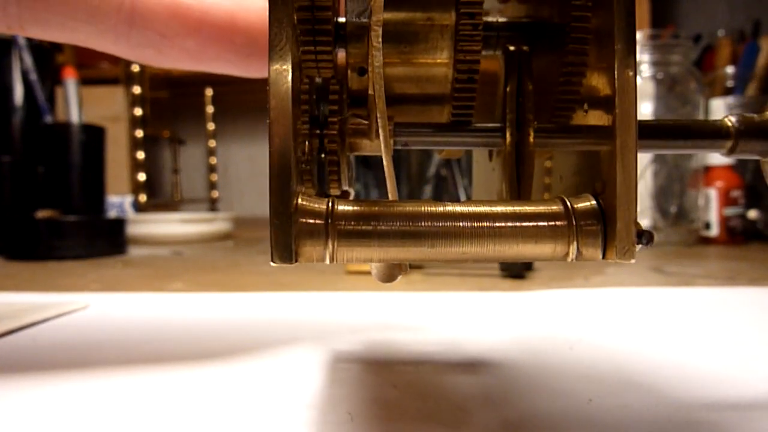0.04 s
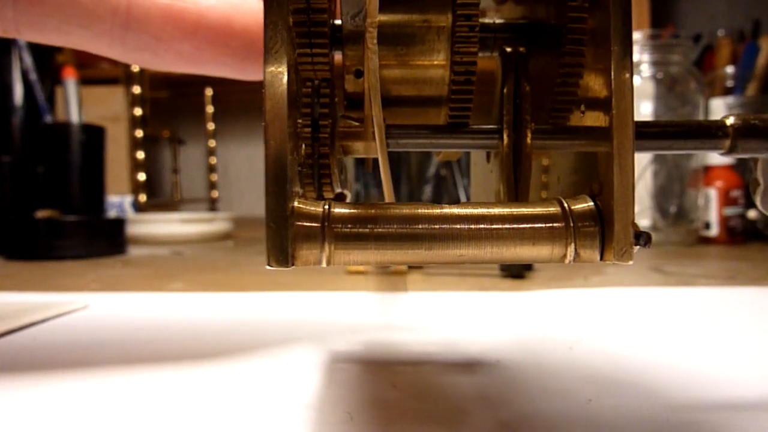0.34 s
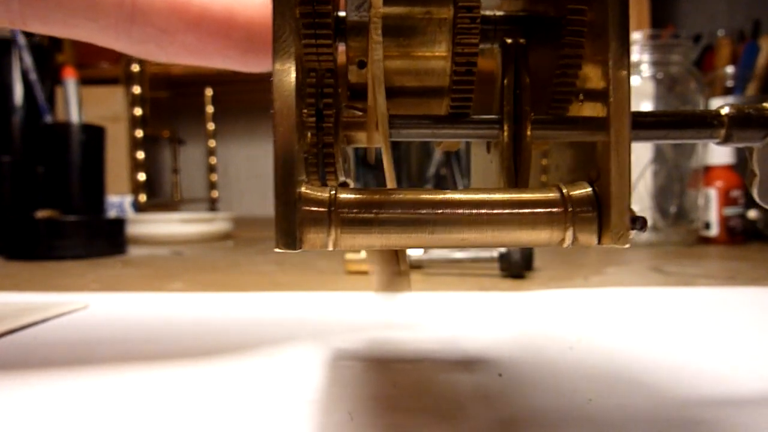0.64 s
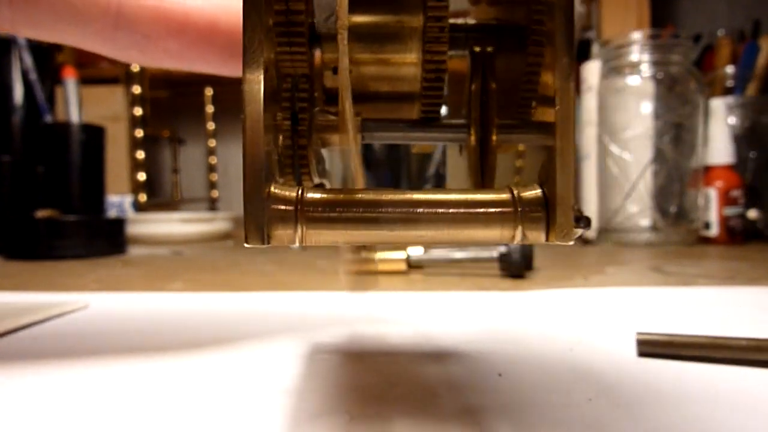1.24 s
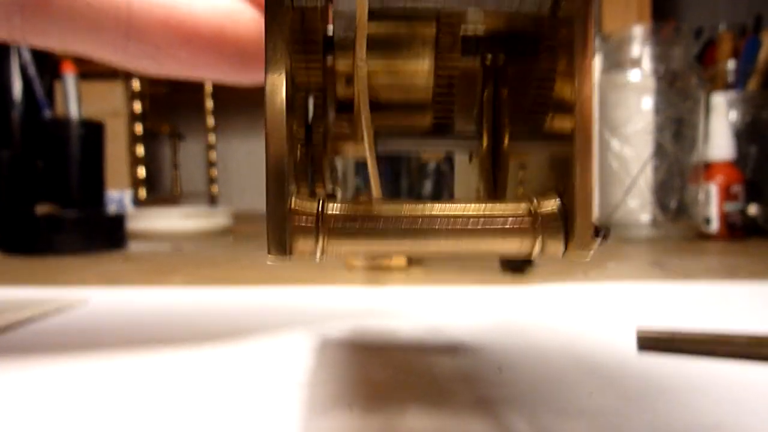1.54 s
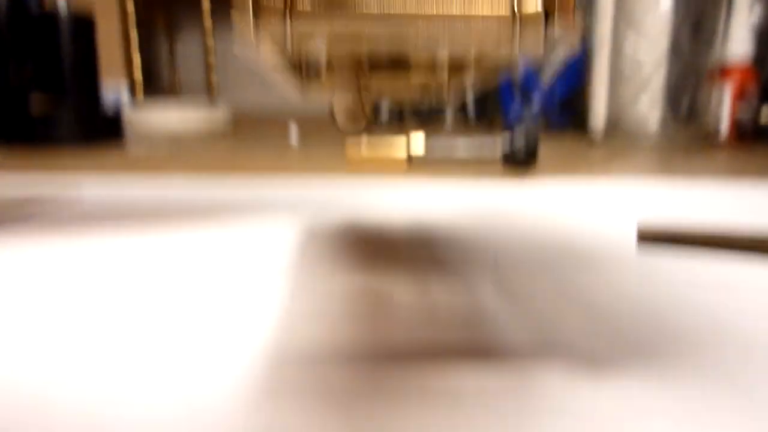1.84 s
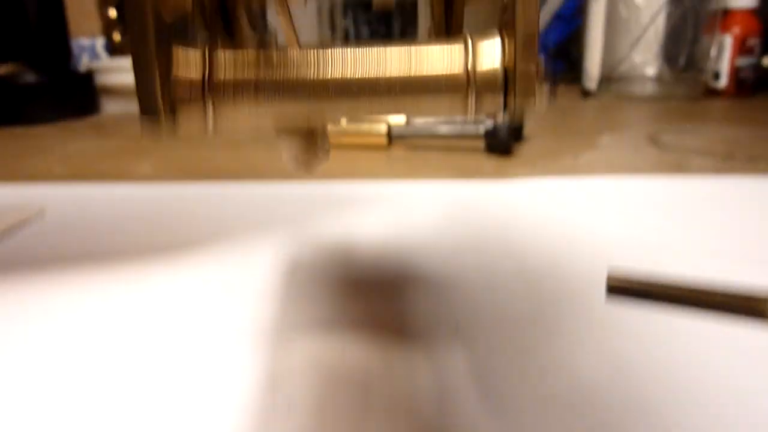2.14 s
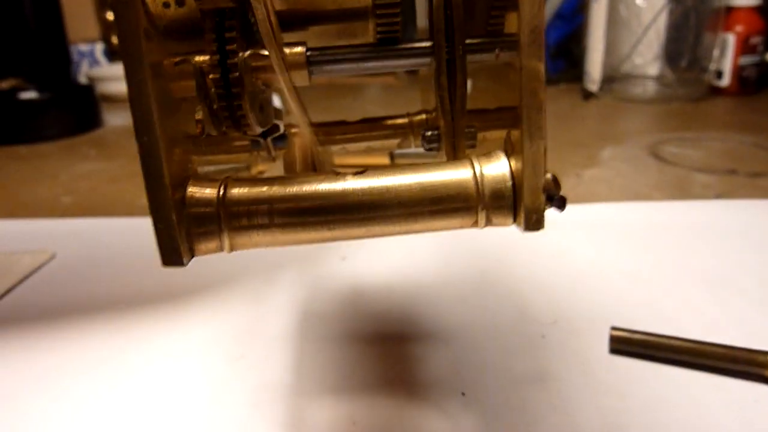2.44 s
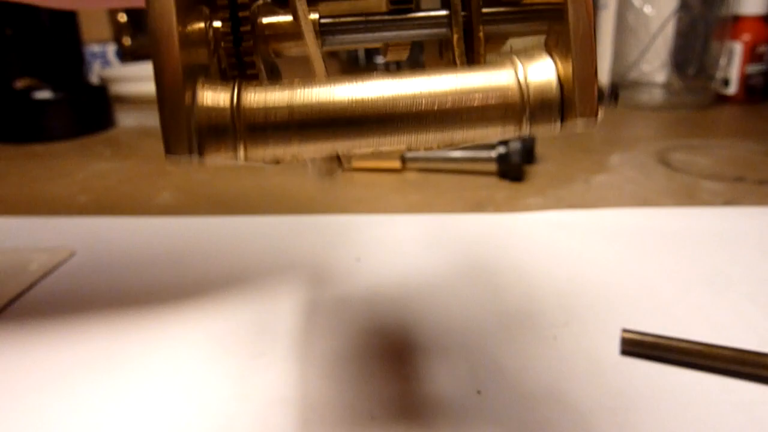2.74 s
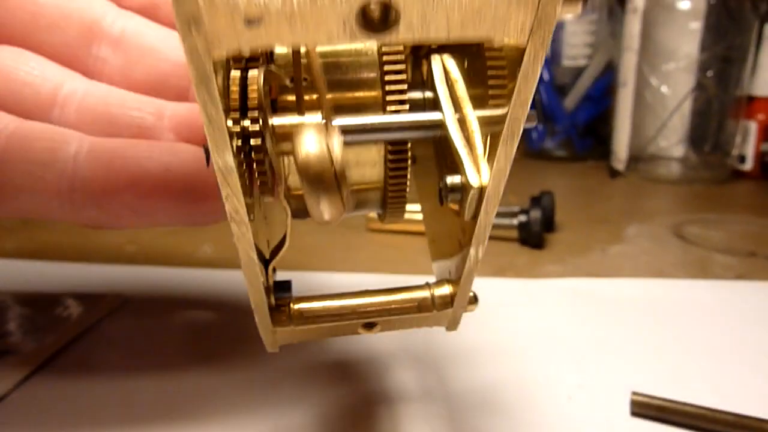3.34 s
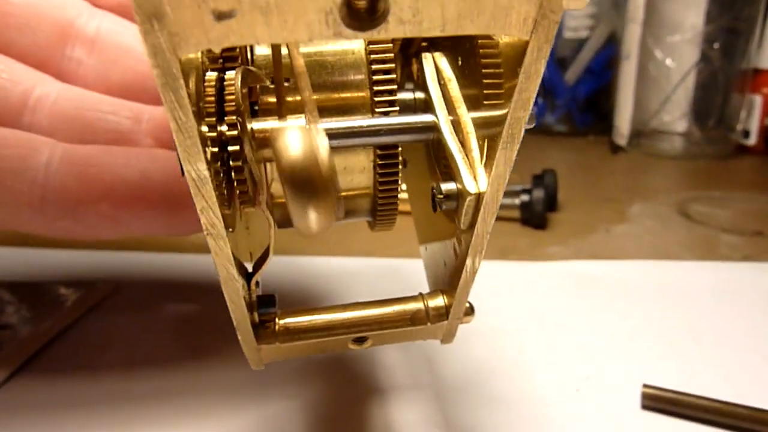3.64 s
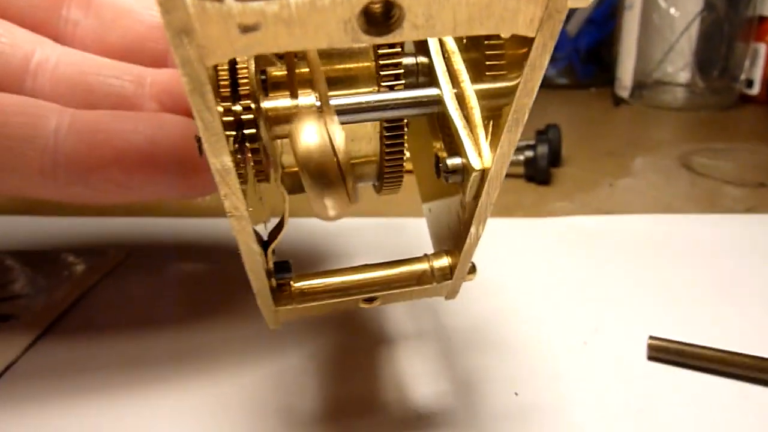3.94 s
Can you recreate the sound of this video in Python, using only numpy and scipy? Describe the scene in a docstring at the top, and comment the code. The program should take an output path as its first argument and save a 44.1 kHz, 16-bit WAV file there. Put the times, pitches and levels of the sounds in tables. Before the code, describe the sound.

Close up in a quiet room, a hand-held clockwork alarm runs as a fast, bright metallic rattle. A rod lands on the workbench with a dull thump early on, then the rattle changes tone and softens slightly.

```python
"""Close above a workbench in a cluttered workshop, a hand-held brass clock movement runs its alarm
train with no bell to strike. The hammer flies to and fro about twenty times a second, a tick on one
pallet and a tock on the other, each blow ringing the frame; in two spells a loose part tings along.
The rattle changes colour as the hand tips the movement, then turns it round. About a second in,
a steel rod is put down on the bench with a few dull thumps."""
import sys
import numpy as np
from scipy import signal
from scipy.fft import rfft, irfft
from scipy.io import wavfile
from scipy.ndimage import uniform_filter1d

SR = 44100
rng = np.random.default_rng(int(sys.argv[2]) if len(sys.argv) > 2 else 0)


def store_pcm(level_fs):
    """Save levels as 16-bit WAV."""
    pcm = np.round(np.clip(level_fs, -1, 1) * 32767).astype(np.int16)
    wavfile.write(sys.argv[1], SR, np.atleast_2d(pcm).T)


N = 4 * SR

# hammer thrown out, and thrown back (time [s], relative level [dB])
TICKS = [(0.1451, -13), (0.1865, -17.5), (0.2312, -16), (0.2757, -17.5), (0.3207, -19.5), (0.3657, -17.5),
         (0.4127, -19), (0.4593, -17), (0.5066, -19.5), (0.5551, -18.5), (0.6043, -19.5), (0.6532, -17.5),
         (0.7006, -18), (0.7479, -17.5), (0.7965, -18), (0.845, -19), (0.8922, -19.5), (0.9404, -18.5),
         (0.9866, -19.5), (1.0314, -19), (1.0776, -18.5), (1.1229, -16), (1.1694, -20.5), (1.2165, -20.5),
         (1.2635, -19.5), (1.3121, -18), (1.3605, -20.5), (1.4101, -16.5), (1.4582, -19), (1.5088, -19),
         (1.5581, -18), (1.6067, -17), (1.6564, -19), (1.7052, -18.5), (1.7545, -18.5), (1.8016, -20),
         (1.8501, -18.5), (1.8969, -19), (1.9444, -18), (1.9907, -18.5), (2.0377, -19), (2.0847, -18),
         (2.1315, -18.5), (2.18, -18), (2.229, -19), (2.2783, -19), (2.3274, -19.5), (2.3777, -17.5),
         (2.427, -17.5), (2.4748, -20), (2.524, -19), (2.5719, -17.5), (2.6204, -18), (2.6687, -19),
         (2.7171, -21), (2.7636, -22), (2.8113, -21.5), (2.857, -22), (2.9063, -21.5), (2.9536, -22.5),
         (3.0029, -23), (3.0518, -22), (3.1015, -19.5), (3.1524, -21), (3.2024, -20.5), (3.2536, -22),
         (3.3023, -20.5), (3.354, -22), (3.4041, -21.5), (3.4539, -19.5), (3.5037, -22), (3.5541, -20.5),
         (3.6037, -22.5), (3.6535, -21.5), (3.7024, -20), (3.7493, -21.5), (3.7991, -20.5), (3.8469, -21),
         (3.8979, -20.5), (3.9473, -21), (3.9986, -20)]
TOCKS = [(0.1617, -21), (0.2059, -21.5), (0.2506, -21), (0.295, -23), (0.3404, -22), (0.3866, -23.5),
         (0.4326, -21.5), (0.479, -21.5), (0.528, -21), (0.5762, -20.5), (0.6255, -21), (0.675, -22),
         (0.7198, -21), (0.7695, -21), (0.818, -23.5), (0.8656, -21), (0.9142, -22), (0.9607, -20),
         (1.0061, -21.5), (1.0522, -21.5), (1.0977, -22.5), (1.1421, -22), (1.1897, -24), (1.2356, -22),
         (1.285, -23.5), (1.333, -20), (1.3818, -23.5), (1.432, -22.5), (1.4794, -22.5), (1.5316, -22.5),
         (1.5775, -21.5), (1.6296, -23), (1.677, -22), (1.727, -21.5), (1.7758, -21), (1.8226, -21.5),
         (1.8702, -21.5), (1.917, -22), (1.9651, -22.5), (2.0103, -21), (2.058, -24), (2.1043, -24.5),
         (2.1523, -24.5), (2.2, -24), (2.2503, -25.5), (2.2998, -25.5), (2.3487, -23.5), (2.3997, -25),
         (2.4459, -23.5), (2.496, -24.5), (2.544, -26), (2.593, -24.5), (2.64, -24), (2.6892, -25.5),
         (2.736, -27.5), (2.7834, -25.5), (2.831, -27), (2.8769, -25.5), (2.925, -27), (2.9731, -25),
         (3.022, -24.5), (3.0702, -21), (3.1208, -23), (3.171, -25.5), (3.221, -25), (3.2726, -27),
         (3.321, -23.5), (3.3728, -24), (3.421, -24.5), (3.472, -25), (3.521, -24), (3.5716, -25),
         (3.6211, -24.5), (3.671, -26), (3.7196, -27), (3.7667, -25.5), (3.8164, -26.5), (3.8655, -26),
         (3.9154, -28), (3.9647, -25.5)]
# parts that ping after a blow (frequency [Hz], relative level [dB], free T60 [s])
TICK_MODES = [(4700, -10, 0.053), (3053, -21, 0.032)]
TOCK_MODES = [(3072, -17.5, 0.029)]
# how the hand holds the movement (time [s], tipped [0-1], turned [0-1], leftward pan [dB])
POSE = [(.15, 0, 0.65, 5), (1.3, 0.01, 0.2, 7), (1.801, 0.02, 0.32, 7), (2.15, 0.73, 0.03, 10),
        (2.9, 0.7, 0.34, 8.5), (3.08, 0.66, 1, 6), (4, 1, 0.99, 9.5)]
# resonances of the brass frame (frequency [Hz], gain [dB])
FRAME_EQ = [(250, -39), (700, -25.5), (860, -19.5), (1000, -30.5), (1300, -31), (1650, -23), (1820, -16),
            (2600, -10.5), (2850, -11.5), (3040, -11), (3380, -13.5), (3650, -11.5), (3950, -13),
            (4400, -3.5), (5300, -15.5), (6500, -8.5), (7900, -19), (8400, -16), (10500, -10.5),
            (12300, -5.5), (12870, 2.5), (13300, -0.5), (13620, 3), (14400, -10.5), (15200, -7.5),
            (16500, -36)]
# top-end lift for the tick, and equal cut for the tock (frequency [Hz], gain [dB])
PALLET_EQ = [(8400, 0), (10500, 2.75), (15200, 2)]
# change of colour when fully tipped, and fully turned (frequency [Hz], gain [dB])
TIPPED_EQ = [(300, -3.5), (850, -5), (1050, 6.5), (1300, 11), (1800, -5.5), (2400, 6.5), (3100, -3),
             (4400, -6.5), (5500, 0.5), (11800, 0), (13000, -2), (14500, -1.5)]
TURNED_EQ = [(300, -7.5), (2200, -2.5), (3700, 3.5), (5500, -3.5), (8000, 1), (9500, 8), (11800, 8.5),
             (13600, -7), (14600, 2)]
# how strongly each band follows the pan (frequency [Hz], pan multiplier [ratio])
PAN_DEPTH = [(1000, 0.017), (3000, 0.68), (4500, 1.56), (5300, 0.38), (14500, 0.62)]
# spells when a part sits loose (start [s], end [s])
LOOSE_SPELLS = [(.65, .94), (1.45, 1.6)]
# rod meets bench; softer landings are lower (time [s], relative level [dB], centre frequency [Hz])
THUMPS = [(0.9531, -30.5, 960), (.954, -25.5, 366), (1.130, -5.5, 760), (1.181, -29.5, 338)]
# modes of the bench top (frequency [Hz], relative level [dB], T60 [s])
BENCH_MODES = [(113, -37.5, 0.4), (204, -28.5, 0.12), (363, -26.5, 0.063), (635, -24, 0.11)]
# spectrum of the quiet room (frequency [Hz], relative level [dB])
ROOM_TONE_EQ = [(30, -9.5), (200, -4), (1400, -7), (14000, -18), (16000, -48)]


def undb(db):
    """Decibels to gain."""
    return 10 ** (np.asarray(db) / 20)


def unit(x):
    """Scale to unit energy."""
    return x / np.sqrt(np.sum(x ** 2, axis=-1, keepdims=True))


def curve(points, hz):
    """Read (Hz, value) points on a log-frequency axis."""
    freqs, values = np.array(points, float).T
    return np.interp(np.log(hz + 1), np.log(freqs), values)


def decay(t, t60):
    """Envelope that falls 60 dB in t60 seconds, held at full level before t = 0."""
    return np.exp(-np.log(1000) * np.maximum(t, 0) / t60)


def minimum_phase(db):
    """Response of an EQ that rings only after the blow."""
    cepstrum = irfft(np.log(undb(db)))
    half = len(cepstrum) // 2
    cepstrum[1:half] *= 2
    cepstrum[half + 1:] = 0
    return np.exp(rfft(cepstrum))


def whiten(burst, bins=41):
    """A burst's spectrum with its broad humps levelled and its fine resonances kept."""
    spectrum = rfft(burst)
    return spectrum / np.sqrt(uniform_filter1d(abs(spectrum) ** 2, bins, axis=-1))


def place(out, start_s, sound):
    """Mix a sound in at its time."""
    i = round(start_s * SR)
    out[:, i:i + sound.shape[-1]] += sound[..., :N - i]


def stereo(mid, side):
    """Mid and side to left and right."""
    return np.array([mid + side, mid - side])


def room_tone(level_db=-64.5):
    """A faint, steady bed of room noise, nearly the same in both ears."""
    colour = undb(curve(ROOM_TONE_EQ, np.fft.rfftfreq(N, 1 / SR)))
    mid, side = unit(irfft(rfft(rng.standard_normal((2, N))) * colour))
    return undb(level_db) * np.sqrt(N) * stereo(mid, 0.42 * side)


def finger_rub(peak_s=0.079, centre_hz=231, level_db=-60.5):
    """Fingers shift on the plates just before the run: one soft, low swell."""
    octave = signal.butter(2, centre_hz * 2 ** np.array([-0.5, 0.5]), "band", fs=SR, output="sos")
    rub = signal.sosfilt(octave, rng.standard_normal(N))
    swell = np.exp(-(np.arange(N) / SR / peak_s - 1) ** 2)
    return undb(level_db) * rub / rub.std() * swell


def tooth_strike(t, hz, grain, tipped, snap_db, crack_s=0.0011, crossover_hz=8750):
    """Mid and side spectra of a tooth that cracks onto a pallet, skids and bounces."""
    skid_s = 0.00056 * rng.uniform(0.5, 1.5)
    bounce_s = 0.0014 * rng.uniform(0.5, 1.5)
    crack = undb(-6) * np.exp(-t / crack_s)
    bounce = rng.random() * (t > bounce_s) * np.exp(-abs(t - bounce_s) / crack_s)
    # the wheels sizzle in their play after each blow
    sizzle = uniform_filter1d(rng.exponential(1, len(t)) ** 2, size=20)
    sizzle *= undb(-32.5 - 7.25 * tipped) * decay(t, t60=0.13)
    body = whiten(grain * (crack + decay(t - skid_s, t60=0.019)))
    top = whiten(grain * (crack * undb(snap_db) + bounce + sizzle + decay(t - skid_s, t60=0.011)))
    treble = 1 / (1 + (crossover_hz / (hz + 1)) ** 6)
    return (1 - treble) * body + treble * top


def ping(t, modes, gain_db):
    """Struck parts ring freely for a few milliseconds, until the next tooth grips them."""
    free_s = 0.0055 * rng.uniform(0.5, 1.5)
    grip = decay(t - free_s, t60=0.019)
    ring = np.zeros(len(t))
    for hz, db, t60 in modes:
        gain = undb(db + gain_db + rng.normal(0, 3.5))
        partial = np.cos(2 * np.pi * hz * rng.normal(1, 0.005) * t)
        ring += gain * unit(partial * decay(t, t60) * grip)
    return ring


def pallet(blows, swing, modes, gain_db, likeness=0.56, size=4096):
    """Blows on one pallet (swing +1 out, -1 back) sound through the frame, coloured by its pose."""
    t, hz, out = np.arange(size) / SR, np.fft.rfftfreq(size, 1 / SR), np.zeros((2, N))
    width = 0.57 * np.minimum(hz / 7500, 1)  # the image opens toward the treble
    push = np.exp(-(hz / 1480) ** 2)  # in the lows a blow is one smooth push
    frame_db = curve(FRAME_EQ, hz) + swing * curve(PALLET_EQ, hz)
    pose_times, *pose_tracks = np.array(POSE, float).T
    grain = rng.standard_normal((2, size))
    for start, db in blows:
        tipped, turned, pan_db = (np.interp(start, pose_times, track) for track in pose_tracks)
        # each blow inherits some of the last one's texture
        grain = likeness * grain + np.sqrt(1 - likeness ** 2) * rng.standard_normal((2, size))
        # the crack sharpens as the pallets turn to face the listener
        mid, side = tooth_strike(t, hz, grain, tipped, snap_db=turned * (24 - swing))
        mid = push + np.sqrt(1 - push ** 2) * mid
        strike = stereo(mid, width * side) / np.sqrt(1 + width ** 2)
        pose_db = tipped * curve(TIPPED_EQ, hz) + turned * curve(TURNED_EQ, hz)
        scatter_db = (1 - push) * np.interp(hz, np.linspace(0, SR / 2, 32), rng.normal(0, 2.5, 32))
        colour = minimum_phase(frame_db + pose_db + scatter_db)
        colour /= np.sqrt(np.mean(abs(colour) ** 2))
        # tipping points the tick's ping away
        ring = ping(t, modes, gain_db=-14.5 * tipped if swing > 0 else 0)
        pan = undb(stereo(0, pan_db * curve(PAN_DEPTH, hz) / 2))
        pan /= np.sqrt(np.mean(pan ** 2, axis=0))
        blow = irfft(pan * (colour * strike + rfft(ring)))[:, :size // 2]
        place(out, start, blow * hit_gain(db + gain_db))
    return out


def hit_gain(db, span_s=0.012):
    """Gain that gives a unit-energy hit the energy of span_s seconds at this level."""
    return undb(db) * np.sqrt(span_s * SR)


def workshop_reverb(sound, send_db, channels=2, predelay_s=0.0015):
    """The clutter scatters a sound into a short, diffuse tail."""
    t = np.arange(SR // 2) / SR
    onset = np.clip(t / predelay_s - 1, 0, 1)
    tail = unit(rng.standard_normal((channels, len(t))) * decay(t, t60=0.12) * onset)
    return undb(send_db) * signal.fftconvolve(sound.mean(axis=0)[None], tail, axes=1)[:, :N]


def loose_part(pitch_hz=8380, gain_db=-17.5):
    """A thin ting rides on each tock while a part sits loose."""
    t, out = np.arange(SR // 8) / SR, np.zeros((2, N))
    for start, db in TOCKS:
        if any(begin < start < end for begin, end in LOOSE_SPELLS):
            hz = pitch_hz * rng.normal(1, 0.008)
            ting = unit(np.sin(2 * np.pi * hz * t) * decay(t, t60=0.045))
            place(out, start, ting * hit_gain(db + gain_db + rng.normal(0, 3.5)))
    return out


def rod_on_bench(lead_s=0.004):
    """Paper cushions each landing of the rod to one soft push; the bench knocks and hums."""
    t, out = np.arange(SR // 2) / SR, np.zeros((2, N))
    hum = sum(undb(db) * np.sin(2 * np.pi * hz * t) * decay(t, t60) for hz, db, t60 in BENCH_MODES)
    for start, db, centre_hz in THUMPS:
        phase = np.pi * centre_hz * (t - lead_s)
        push = (1 - 2 * phase ** 2) * np.exp(-phase ** 2)
        burst = rng.standard_normal(len(t)) * decay(t, t60=0.035)
        knock = undb(-4.5) * unit(irfft(whiten(burst, bins=161)))
        thump = push + signal.fftconvolve(push, knock)[:len(t)]
        place(out, start - lead_s, undb(db) * thump)
        softness = 765 / centre_hz  # a softer landing pushes longer and wakes more hum
        place(out, start, undb(db) * softness * hum)
    return out


def scene():
    """The rattle up front and the rod's thumps, each with a little reverb, over room tone."""
    catch_release = (0.069, -50)  # the catch lets go (time [s], relative level [dB])
    ticks = pallet(TICKS, swing=1, modes=TICK_MODES, gain_db=-3.5)
    tocks = pallet([catch_release, *TOCKS], swing=-1, modes=TOCK_MODES, gain_db=-0.5)
    low_cut = signal.butter(2, 178, "high", fs=SR, output="sos")  # the small frame radiates little bass
    rattle = signal.sosfilt(low_cut, ticks + tocks + loose_part())
    thumps = rod_on_bench()
    reverb = workshop_reverb(rattle, send_db=-15.5) + workshop_reverb(thumps, send_db=-11.5, channels=1)
    return rattle + thumps + reverb + finger_rub() + room_tone()


def record(dry):
    """A steep high cut at 16.5 kHz trims the very top."""
    return signal.sosfilt(signal.ellip(8, 0.2, 80, 16500, fs=SR, output="sos"), dry)


dry = scene()
out = record(dry)
store_pcm(out)
```